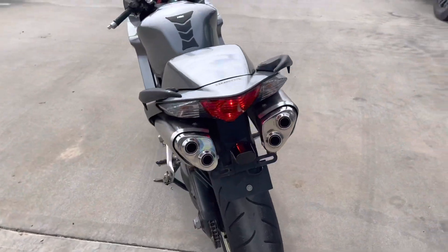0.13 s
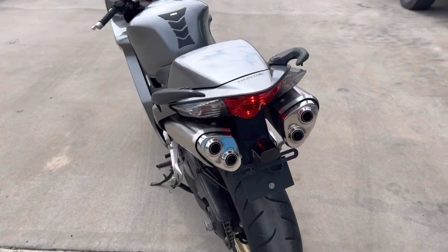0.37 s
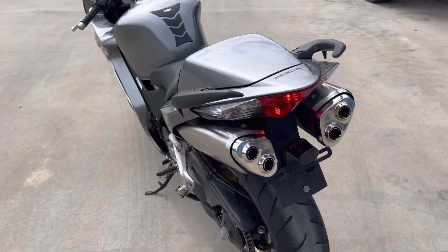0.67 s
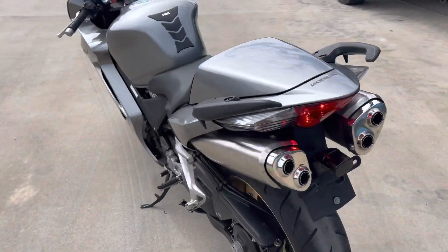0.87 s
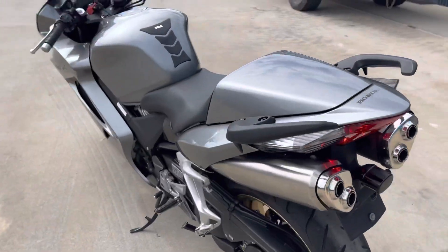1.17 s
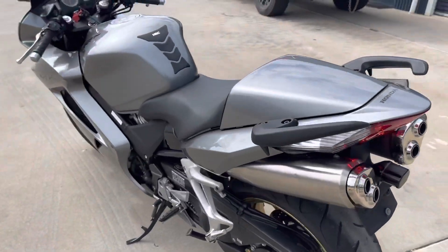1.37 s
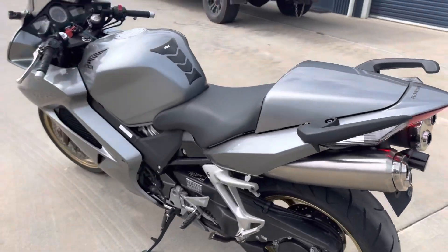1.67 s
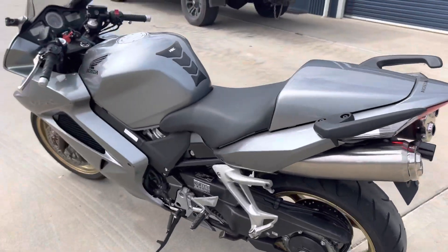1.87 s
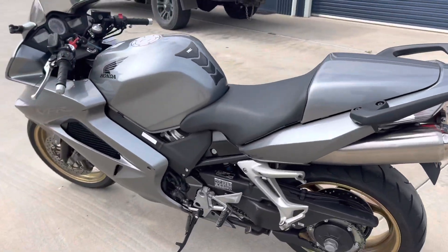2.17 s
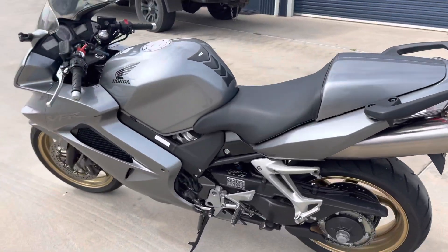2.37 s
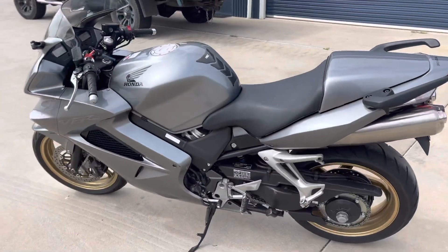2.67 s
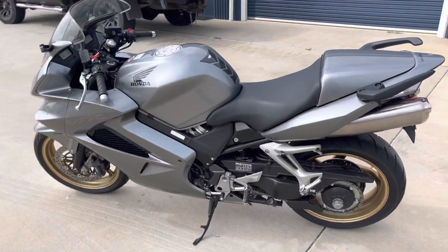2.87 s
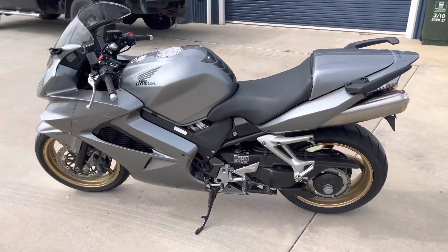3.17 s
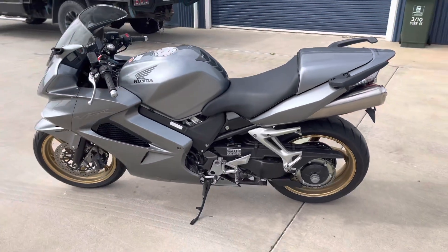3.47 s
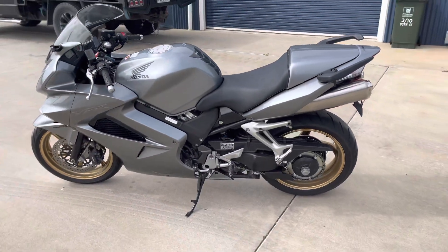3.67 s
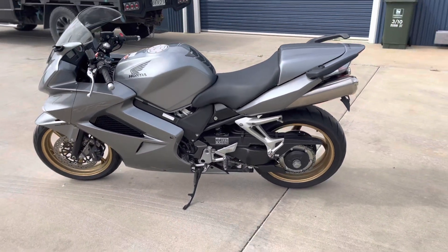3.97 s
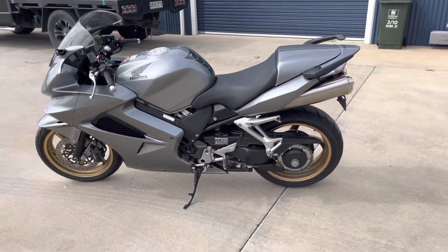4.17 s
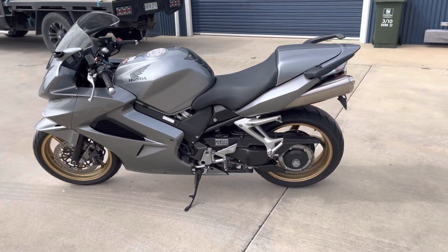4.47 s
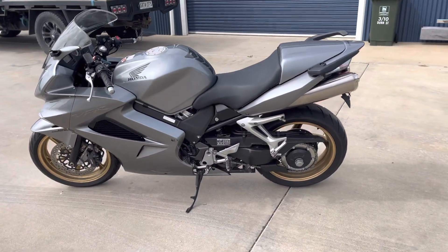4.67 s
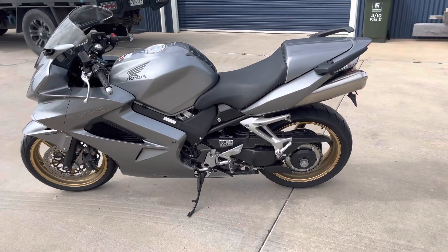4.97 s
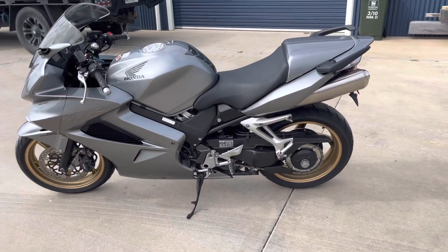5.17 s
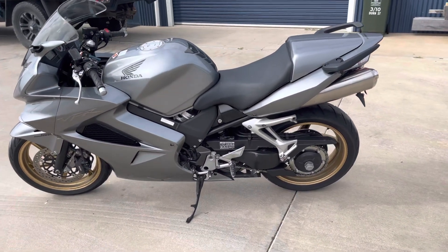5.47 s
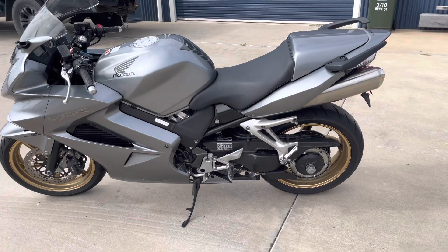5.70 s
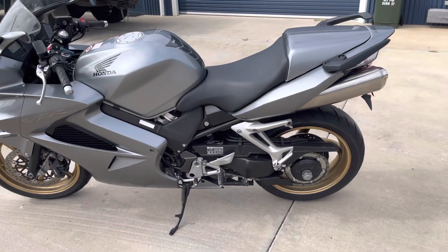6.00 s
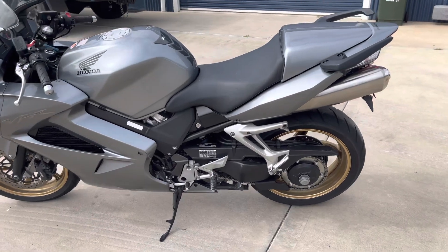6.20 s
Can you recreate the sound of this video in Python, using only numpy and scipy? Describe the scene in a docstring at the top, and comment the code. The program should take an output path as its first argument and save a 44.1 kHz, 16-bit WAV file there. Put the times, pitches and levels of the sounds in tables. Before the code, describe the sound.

A four-cylinder motorcycle idles continuously from 0 to about 6.3 seconds on an open concrete yard, picked up close by a hand-held stereo microphone. The exhaust is a deep, smooth boom around 55 hertz with a loping, uneven throb, slightly hunting in speed but never revving. From 0 to 0.4 seconds, behind the bike, rapid hard wind buffets thump the microphone over low, lumpy wind. By 1 second the rear quarter brings more metallic putter, case rattle and hissy valve ticking. More strong buffets hit from 1.5 to 1.9 and at 2.1 to 2.2 seconds, the bass briefly dipping afterwards. From 2.5 the wind calms, exposing clatter, a hollow note and a faint, thin whine near 1.7 kilohertz. One softer thump comes at 4.2 seconds; several more arrive from 5.8 to 6.2, with the idle continuing to the end.

```python
"""A motorcycle exhaust booms with a loping idle under hard wind buffets, close to a hand-held camera's two ports.
The camera walks round the four-cylinder engine on a concrete yard: behind, rear quarter, beside, close beside.
The exhaust sums multiples of the rate of engine-cycle pairs, with silencer rings and a low rumble. Clicks timed
by the cycle drive resonances and hiss for cases and valve gear; a cover plate whines. Wind is lumpy filtered
noise, and each hard buffet is a short swing of pressure."""
import sys
import numpy as np
from scipy import signal
from scipy.fft import rfft, irfft
from scipy.io import wavfile
from scipy.ndimage import uniform_filter1d, map_coordinates

SR = 44100
rng = np.random.default_rng(int(sys.argv[2]) if len(sys.argv) > 2 else 0)


def generate_wav(sig):
    """Save sig (samples, or channels by samples) to the path in sys.argv[1] as 16-bit PCM at SR."""
    pcm = np.round(np.clip(np.atleast_2d(sig).T, -1, 1) * 32767).astype(np.int16)
    wavfile.write(sys.argv[1], SR, pcm)


N = 279594

# Place of the camera: behind, at the rear quarter, beside and close beside the engine [t/s]
VIEW_TIMES = [0.598, 1.601, 3.201, 5.298]

# Breeze between gusts [t/s, level/dB before the low band's lift in wind()]
BREEZE_LEVEL = [(0, -27), (1.4, -27), (2.0, -26), (2.5, -31), (3.3, -34), (5.5, -33), (6.34, -30.5)]
BREEZE_BRIGHT_DB = -10  # bright band relative to the low band
# Gusts [start of full strength t/s, time held/s, level/dB as for the breeze, bright band re that level/dB]
GUST_EVENTS = [(0, 0.071, -20.5, -8), (0.18, 0.1, -19.5, -6.5), (0.275, 0.046, -17.5, -12),
               (1.5, 0.048, -19, -20), (1.604, 0.029, -16, -10), (1.675, 0.047, -17.5, -6.5),
               (1.802, 0.039, -21.5, -8), (2.11, 0.066, -21, -20), (2.186, 0.074, -20.5, -7),
               (2.257, 0.097, -22.5, -12), (3.259, 0.025, -24, -19), (4.197, 0.04, -27.5, -25),
               (4.352, 0.15, -26, -30), (5.753, .18, -24, -10.5), (5.99, 0.11, -22, -14)]
GUST_RISE_S, GUST_FALL_S = 0.045, 0.03
# Shape of the wind's spectrum [f/Hz, level/dB]
WIND_SPECTRUM = [(25, -46), (45, 0), (70, 1.5), (110, 5), (200, -7), (300, -14.5), (500, -29), (900, -41),
                 (2000, -83.5)]
# Single hard buffets [t/s, swing level/dB, f/Hz, edge re swing/dB, half length/s]
BUFFETS = [(0.0255, -13.5, 230, -6, 0.0039), (.105, -12, 169, -14, 0.0023), (0.181, -15.5, 252, -6, 0.0055),
           (0.225, -20, 200, 5, 0.004), (0.264, -24, 218, -13, 0.0038), (0.319, -13, 180, -3, 0.0035),
           (.387, -15, 192, -16, 0.004), (1.53, -19, 150, -10, 0.0049), (1.575, -19, 298, -23, 0.0022),
           (1.596, -9.5, 202, -4.5, 0.0045), (1.65, -28, 110, -16, 0.0068), (1.684, -20.5, 370, 4, 0.0068),
           (1.699, -22.5, 523, -14, 0.0033), (1.714, -12, 166, -12, 0.0021),
           (1.837, -9.5, 110, -9.5, 0.0087), (1.845, -9.5, 172, -9, 0.0026),
           (2.135, -16.5, 134, -21, 0.0069), (2.211, -13, 193, -8, 0.0042), (4.219, -16.5, 144, -20, .011),
           (5.832, -17, 176, -14, 0.0041), (5.926, -19, 170, -9, 0.0045), (6.039, -24, 170, -9, 0.0046),
           (6.241, -19, 150, -14, 0.0075)]
BUFFET_EDGE_S, BUFFET_LAG_S = 0.0005, 0.00026  # half length of the edge; delay between the ports
# Drops of the bass, each just after a hard buffet [t/s, depth/dB]
BASS_DROPS = [(1.85, -3.5), (2.225, -8)]
DROP_FALL_S, DROP_HOLD_S, DROP_BACK_S = 0.016, 0.32, 0.22

# Echo off the concrete [t/s, delay/s]
GROUND_DELAY = [(0, 0.0027), (1.5, 0.0014), (2.3, 0.0012), (3, 0.0017), (6.34, 0.0014)]
GROUND_SHARE = 0.07
# The two ports: likeness [f/Hz, 0 to 1], left over right [f/Hz, level/dB], lead of the left [f/Hz, phase/rad]
PORT_LIKENESS = [(60, 0.67), (120, 0.67), (250, 1), (520, 0.94), (1060, 0.9), (2170, 0.73), (4440, 0.99),
                 (9100, 0.61)]
PORT_BALANCE = [(60, 0.76), (210, 1.4), (740, 1.1), (2590, 2.4), (9100, 1)]
PORT_LEAD = [(0, -2.6), (1720, 0.81), (2330, 0.3), (4910, 1.34), (6720, 0.26), (7580, 0.78), (8870, -1.13),
             (9300, -2.5)]
BAND_LIMIT_HZ = 9700

# Idle speed, hunting up and down [t/s, pairs of engine cycles per second]
IDLE_SPEED = [(0, 5.516), (0.3, 5.529), (0.5, 5.408), (1, 5.585), (1.4, 5.549), (2.1, 5.422), (2.3, 5.535),
              (2.55, 5.286), (3.15, 5.544), (3.65, 5.593), (3.95, 5.456), (4.2, 5.505), (4.55, 5.337),
              (4.9, 5.579), (5.2, 5.529), (5.7, 5.679), (6.34, 5.431)]
START_TURN = -.280  # place in the pair of cycles, in turns

# Blows within one engine cycle, per mechanism [place/turn, mean level/dB]
FIRING_BLOWS = [(.05, 0), (.47, -5), (.68, -5)]
EXHAUST_POPS = [(.05, 0), (.35, -5), (.63, 0)]
CASE_KNOCKS = [(.02, -1), (.365, 0), (.5, -8), (.72, -8), (.87, -9)]
LOWER_CASE_KNOCKS = [(0, 0), (.43, -7), (.84, -1)]
GEAR_MESHES = [(.03, 0), (.13, -2), (.32, 1), (.45, -9), (.66, -3)]
VALVE_TAPS = [(.09, 0), (.16, -4), (.27, -9), (.38, -4), (.5, -6), (.72, -7), (.9, -7)]

# Ring of a cover plate [t/s, level/dB, f/Hz]
COVER_WHINE = [(0, -47, 1664), (.7, -54.5, 1651), (1.2, -44, 1674), (1.8, -44, 1668), (2.0, -52, 1651),
               (2.3, -42, 1656), (2.75, -54, 1632), (3.2, -48.5, 1665), (4.1, -46.5, 1670),
               (4.4, -51, 1700), (4.9, -48, 1688), (5.7, -44, 1700), (6.34, -58, 1692)]

# Nearness of the engine [t/s, level of the cases/dB, treble re cases/dB]
ENGINE_NEARNESS = [(0, -37.5, -5), (.9, -35, -3.5), (1.85, -34, -1.5), (2.56, -35, -1.5), (3.81, -35.5, -3),
                   (4.45, -37, -1.5), (5, -35, -3.5), (5.69, -34, -3.5), (6.34, -34, -1.5)]
# Shape of the rattle and hiss spectrum [f/Hz, level per Hz/dB]
CLATTER_SPECTRUM = [(300, -19.5), (420, -11), (550, -9), (680, -9), (800, -2), (920, -5.5), (1230, -7),
                    (1400, -11.5), (1560, -11), (1900, -11), (2090, -11), (2300, -13), (2700, -14),
                    (3900, -12), (5370, -15), (6980, -14), (7700, -8), (9550, -18.5), (12000, -72.5)]
# Ringing of cases, then of valve gear [f/Hz, width/Hz, mean level/dB at each of the four camera places]
CASE_RINGS = [(706, 160, -12, -10.5, -11, -23), (1018, 58, -6.5, -16.5, -26.5, -25),
              (1198, 100, -34.5, -19, -11, -14.5), (1340, 100, -12.5, -10.5, -17.5, -14.5),
              (1943, 70, -18.5, -34, -14, -25.5), (2196, 63, -35, -15, -26, -16)]
VALVE_RINGS = [(2970, 82, -23, -21.5, -18.5, -24), (3190, 27, -16, -19, -19, -21),
               (3460, 52, -15, -27.5, -15.5, -24.5), (5200, 25, -26, -40, -32.5, -22),
               (6540, 120, -18, -16, -28, -25.5), (8050, 40, -24.5, -24, -29, -23)]
# Ring of a tappet before its soft start [f/Hz, level/dB, t60/s]
TAPPET_RING = [(8140, -4, 0.04), (7494, 1.5, 0.019), (7200, 2, 0.0091), (8940, -10.5, 0.043),
               (7850, -26, 0.014)]
# Sharpest valve ticks, before ground and ports [t/s, peak level/dB]
SHARP_TICKS = [(0.614, -30), (1.2408, -28), (1.8726, -31), (1.941, -28), (2.146, -24.5), (2.3312, -22),
               (2.5206, -26), (3.706, -29), (4.621, -32), (5.218, -28), (5.696, -27), (5.8726, -38),
               (6.1494, -29)]
# Main resonance of the cases before its waver [t/s, f/Hz]
CASE_RESONANCE = [(0, 800), (1, 780), (1.8, 745), (2.5, 770), (3.2, 800), (6.34, 800)]
LOWER_HZ, LOWER_DB = 678, -6  # its weaker companion: f before the waver, level re main
# Hollow note at each firing [level/dB at each of the four camera places]
AIRBOX_LEVEL = [-27.5, -14.5, -8, -10.5]
AIRBOX_HZ = 406.7

# Exhaust [t/s, boom peak/dB before bass drops, lope: sign is the harder cycle and size how hard, upper re boom/dB]
EXHAUST_COURSE = [(0, -13.5, 0.69, -14), (.6, -13.5, 0.62, -9.5), (1.4, -12, 0.74, -12.5),
                  (1.75, -16.5, 1, -11), (2.2, -17, 0.97, -10), (2.6, -16, -0.29, 1), (2.9, -18, -0.92, -9),
                  (3.6, -15.5, -0.56, -9.5), (4.05, -19, -0.82, -6.5), (4.25, -16.5, -0.63, -5),
                  (4.47, -20, -1, -1.5), (5.0, -15.5, -0.6, -11), (5.65, -15, -0.45, -9.5),
                  (5.9, -18, -1.45, -21), (6.34, -16, -0.65, -3)]
BOOM_ORDER, UPPER_ORDER = 10, 16  # multiples of the pair rate
# Spectrum of the hard firing [multiple of the pair rate, level re boom/dB; odd ones before the lope]
KICK_SPECTRUM = [(6, -34), (7, -25), (9, -16), (11, -5), (12, -12), (13, -11), (14, -28), (15, -18),
                 (17, -22), (18, -25), (22, -28), (32, -27)]
KICK_TURN, KICK_LAG = -.143, .8  # place in the pair of cycles in turns; lag in radians
# Spectral shape of the steady low rumble under the boom [f/Hz, level/dB]
RUMBLE_SPECTRUM = [(30, -24.5), (45, 2.5), (60, -6.5), (75, 10), (110, 0), (200, -23), (400, -37)]
RUMBLE_DB = -20  # rms re boom peak
# Silencer rings after a blow, before their soft start [f/Hz, level re boom/dB, t60/s]
SILENCER_RINGS = [(140.5, -6, 0.052), (204, -17, 0.018)]


def gain_of(db):
    """Decibels to a factor."""
    return 10 ** (np.asarray(db) / 20)


def evened(x):
    """Scales to rms 1."""
    return x / np.sqrt(np.mean(x ** 2) + 1e-20)


def read(points, hz):
    """Reads a spectrum table on a log-frequency axis."""
    f, value = np.transpose(points)
    return np.interp(np.log(hz + 1), np.log(f + 1), value)


def curves(rows):
    """Each column of a table as a value per sample."""
    s, *columns = np.transpose(rows)
    return [np.interp(np.arange(N) / SR, s, c) for c in columns]


def at_views(db):
    """Interpolates levels between the four places of the camera."""
    return np.interp(np.arange(N) / SR, VIEW_TIMES, db)


def band(x, order, hz, kind="low"):
    """Keeps what lies below hz, or above it for kind "high"."""
    return signal.sosfilt(signal.butter(order, hz, kind, fs=SR, output="sos"), x)


def colour(x, points):
    """Filters by a dB spectrum."""
    return irfft(rfft(x) * gain_of(read(points, np.fft.rfftfreq(N, 1 / SR))), N)


def lumps(hz):
    """Slow chance of rms 1 that changes up to about hz times a second."""
    return evened(band(rng.standard_normal(N), 2, hz))


def plateau(start, rise_s, hold_s, fall_s):
    """0 to 1, held, and back to 0."""
    return np.interp(np.arange(N) / SR, start + np.cumsum([0, rise_s, hold_s, fall_s]), [0, 1, 1, 0])


def resonate(x, hz, width):
    """A resonance that follows the curve hz: shifts it down to zero, smooths, and shifts back."""
    turn = np.exp(2j * np.pi * np.cumsum(hz * np.ones(len(x))) / SR)
    r = np.exp(-np.pi * width / SR)
    return 2 * (turn * signal.lfilter([1 - r], [1, -r], x / turn)).real


def note(hits, hz, width):
    """A steep two-pass resonance: a short soft note after a click, a fuzzy line on rattle."""
    return evened(resonate(resonate(hits, hz, width), hz, width))


def ringing(drive, table):
    """Resonances whose strength wavers and changes with the place of the camera."""
    total = 0
    for hz, width, *db in table:
        level = gain_of(at_views(db) + .7 * lumps(0.75))
        total = total + level * note(drive, hz, 1.77 * width)  # wider, as two passes narrow it
    return total


def modes(table, rise_s):
    """The ring of a struck thing: decaying sines with a soft start."""
    t = np.arange(4000) / SR
    ring = sum(gain_of(db - 60 * t / t60) * np.sin(2 * np.pi * hz * t) for hz, db, t60 in table)
    return (1 - np.exp(-t / rise_s)) * ring


def blows(turns, table, spread_db):
    """A click of chance size each time the engine cycle passes one of the blows."""
    clicks = np.zeros(N)
    for turn, db in table:
        at = np.flatnonzero(np.diff(np.floor(2 * turns - turn)))  # two engine cycles per turn of the pair
        clicks[at] = gain_of(db + spread_db * np.tanh(rng.standard_normal(len(at))))
    return clicks


def burst(clicks, decay_s):
    """A quick rise and an exponential fall after each click."""
    t = np.arange(4000) / SR
    return signal.oaconvolve(clicks, (1 - np.exp(-t / 0.01)) * np.exp(-t / decay_s))[:N]


def ground(x):
    """The echo off the concrete combs the rattle; the comb shifts as the camera moves."""
    delay_s, = curves(GROUND_DELAY)
    late = map_coordinates(x, [np.arange(N) - delay_s * SR], order=3)
    return (x + GROUND_SHARE * late) / np.sqrt(1 + GROUND_SHARE ** 2)


def ports(x):
    """Two microphone ports: a balance, a phase lead, and a share scattered by the yard whose phase drifts."""
    hz, _, z = signal.stft(x, SR, nperseg=256)
    same = np.clip(read(PORT_LIKENESS, hz), 0, 1)[:, None]
    drift = uniform_filter1d(rng.standard_normal(z.shape), size=90, axis=1)  # smooth in time
    drift = evened(uniform_filter1d(drift, size=2, axis=0))  # and in frequency
    scattered = np.sqrt(1 - same ** 2) * np.exp(2.5j * drift)
    right = (same + scattered) * z * np.exp(-1j * read(PORT_LEAD, hz))[:, None]
    tilt = gain_of(read(PORT_BALANCE, hz) / 2)[:, None]  # half the balance on each port
    return signal.istft(np.array([z * tilt, right / tilt]), SR, nperseg=256)[1][:, :N]


def bass_dips():
    """The gain of the bass: it drops quickly, stays down and creeps back; overlapping drops add in dB."""
    return gain_of(sum(db * plateau(s, DROP_FALL_S, DROP_HOLD_S, DROP_BACK_S) for s, db in BASS_DROPS))


def gusts():
    """Level of the low and of the bright wind: the stronger of breeze and gust at each moment."""
    low = gain_of(curves(BREEZE_LEVEL)[0])
    top = low * gain_of(BREEZE_BRIGHT_DB)
    for start, length, db, bright_db in GUST_EVENTS:
        shape = plateau(start - GUST_RISE_S, GUST_RISE_S, length, GUST_FALL_S) * gain_of(db)
        low = np.maximum(low, shape)
        top = np.maximum(top, shape * gain_of(bright_db))
    return low, top


def wind(shared=0.83):
    """Turbulence as lumpy low noise, partly unrelated at the two ports, with its own brightness per gust."""
    low_gain, top_gain = gusts()
    both, *own = (rng.standard_normal(N) * gain_of(2.0 * lumps(45)) for _ in range(3))
    both = band(both, 2, 90, "high")  # the deepest lumps are local to each port
    air = np.sqrt(shared) * both + np.sqrt(1 - shared) * np.array(own)
    air = evened(colour(air, WIND_SPECTRUM))
    top = evened(band(air, 3, 300, "high"))
    low = gain_of(0.5) * band(air, 3, 300)  # lift of the low band
    return bass_dips() * low_gain * low + top_gain * top


def thumps():
    """Each buffet is a short swing of pressure with a sharp edge in its middle; the right port gets it first."""
    out = np.zeros((2, N))
    t = np.arange(-1000, 1000) / SR + np.array([[-.5], [.5]]) * BUFFET_LAG_S
    for s, db, hz, edge_db, half_s in BUFFETS:
        swing = np.exp(-(t / half_s) ** 2) * np.sin(2 * np.pi * hz * t)
        edge = 2 * t / BUFFET_EDGE_S * np.exp(-(t / BUFFET_EDGE_S) ** 2)
        start = round(s * SR) - 1000
        out[:, start:start + 2000] += gain_of(db) * (swing + gain_of(edge_db) * edge)
    return out


def whine(turns):
    """A thin wavering line with fuzz round it, kept ringing by the gears and swelling at each blow."""
    db, hz = curves(COVER_WHINE)
    swell = 0.2 + burst(blows(turns, GEAR_MESHES, spread_db=0.5), 0.0074)
    wavering_hz = hz * (1 + 0.00788 * lumps(34.0))
    line = np.cos(2 * np.pi * np.cumsum(wavering_hz) / SR)
    fuzz = note(rng.standard_normal(N), hz, 110)
    return gain_of(db) * evened(swell * (line + 1.6 * fuzz))


def valve_gear(turns):
    """Hiss that swells after each blow, tappets that ring, and the sharpest ticks."""
    near_db, treble_db = curves(ENGINE_NEARNESS)
    taps = blows(turns, VALVE_TAPS, spread_db=3.5)
    ring = modes(TAPPET_RING, 0.0016)
    swell = 0.47 + burst(taps, 0.004)
    rustle = swell * gain_of(.5 * lumps(22.0)) * rng.standard_normal(N)
    hiss = evened(band(colour(rustle, CLATTER_SPECTRUM), 2, 2500, "high"))
    tappets = gain_of(-9.0) * evened(signal.oaconvolve(taps, ring)[:N])
    treble = evened(hiss + tappets + ringing(rustle, VALVE_RINGS))

    s, db = np.transpose(SHARP_TICKS)
    sharp = np.zeros(N)
    sharp[np.round(s * SR).astype(int)] = gain_of(db)
    ticks = signal.oaconvolve(sharp, ring / abs(ring).max())[:N]
    return gain_of(near_db + treble_db) * treble + ticks


def cases(turns):
    """Each knock puts soft notes into the main resonances of the cases; rattle rings in the others."""
    hits = blows(turns, CASE_KNOCKS, spread_db=1.8)
    rattle = (.8 + .6 * burst(hits, 0.006)) * rng.standard_normal(N)
    body = evened(band(colour(rattle, CLATTER_SPECTRUM), 2, 2500))
    waver = 1 + 0.024 * lumps(19.0)  # the pitch of the notes wavers slightly
    putter = note(hits, curves(CASE_RESONANCE)[0] * waver, 75)
    lower_hits = blows(turns, LOWER_CASE_KNOCKS, spread_db=2.6)
    putter = putter + gain_of(LOWER_DB) * note(lower_hits, LOWER_HZ / waver, 40)
    firings = blows(turns, FIRING_BLOWS, spread_db=4.0)
    airbox = gain_of(at_views(AIRBOX_LEVEL)) * note(firings, AIRBOX_HZ, 55)
    mix = body + gain_of(-4.0) * putter + airbox + ringing(rattle, CASE_RINGS)
    return gain_of(curves(ENGINE_NEARNESS)[0]) * evened(mix)


def exhaust(turns):
    """Two booming orders; the kick's odd orders change sign when it moves to the other cycle of the pair."""
    boom_db, lope, upper_db = curves(EXHAUST_COURSE)
    boom = np.cos(2 * np.pi * BOOM_ORDER * turns)
    upper = np.cos(2 * np.pi * UPPER_ORDER * turns + 0.76 * lumps(3.5))  # its phase wavers
    wave = boom + gain_of(upper_db) * upper
    for k, db in KICK_SPECTRUM:
        strength = gain_of(db) * (lope if k % 2 else 1)
        wave += strength * np.cos(2 * np.pi * k * (turns - KICK_TURN) - KICK_LAG)
    rumble = evened(colour(rng.standard_normal(N), RUMBLE_SPECTRUM))
    pops = signal.oaconvolve(blows(turns, EXHAUST_POPS, spread_db=4.5), modes(SILENCER_RINGS, 0.0067))[:N]
    return gain_of(boom_db) * (wave + pops + gain_of(RUMBLE_DB) * rumble)


def scene():
    """Exhaust in the middle, the engine's rattle through the port pair, wind on top."""
    turns = START_TURN + np.cumsum(curves(IDLE_SPEED)[0]) / SR
    rattle = ports(ground(cases(turns) + valve_gear(turns)) + whine(turns))
    return bass_dips() * exhaust(turns) + wind() + rattle + thumps()


def record(dry):
    """The band limit: a steep low-pass."""
    low_pass = signal.firwin(511, BAND_LIMIT_HZ, window=("kaiser", 9), fs=SR)
    return signal.oaconvolve(dry, low_pass[None], "same")


dry = scene()
out = record(dry)
generate_wav(out)
```